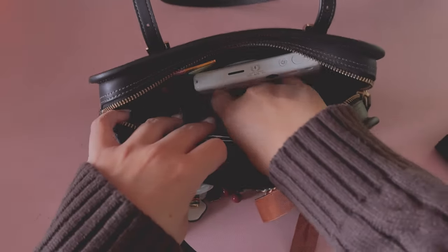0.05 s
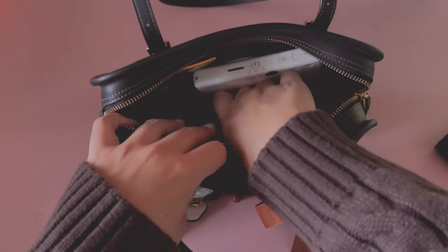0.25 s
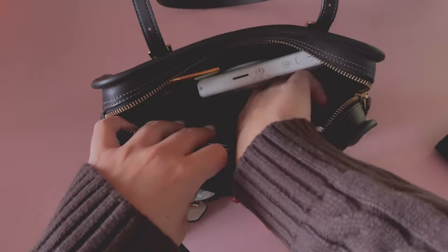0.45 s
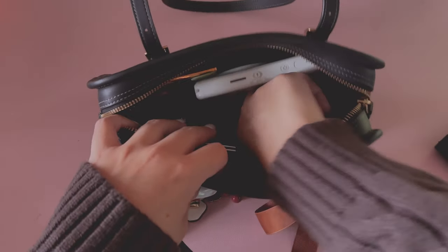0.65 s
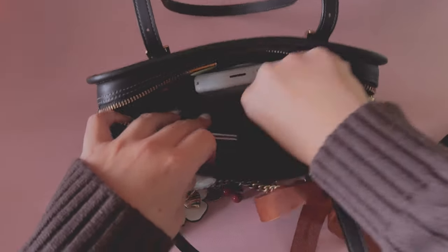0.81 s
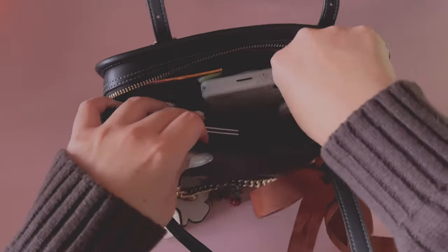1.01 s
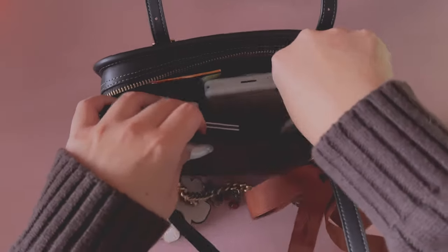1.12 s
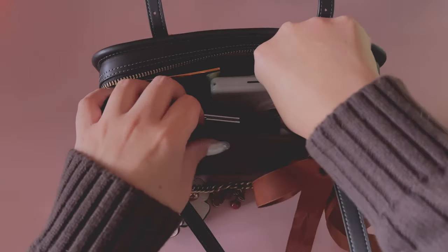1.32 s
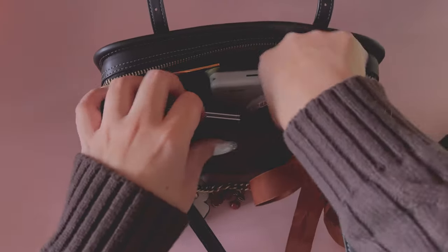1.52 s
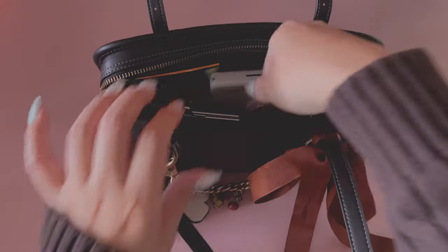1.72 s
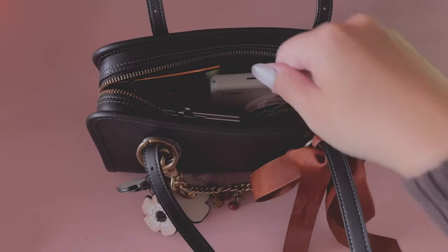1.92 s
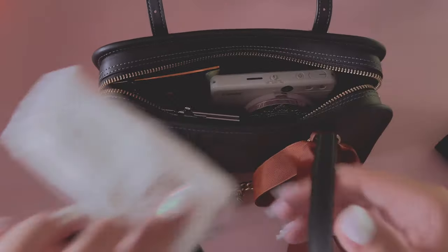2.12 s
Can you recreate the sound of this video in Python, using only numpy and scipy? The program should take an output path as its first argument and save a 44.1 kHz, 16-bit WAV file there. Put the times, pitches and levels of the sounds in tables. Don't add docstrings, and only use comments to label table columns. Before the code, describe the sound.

A small hollow plastic camera is pushed into a leather handbag with rustles, knocks and a thud

```python
import sys
import numpy as np
from scipy import signal
from scipy.fft import rfft, irfft, next_fast_len
from scipy.io import wavfile

SR = 44100
rng = np.random.default_rng(int(sys.argv[2]) if len(sys.argv) > 2 else 0)


def to_linear_factor(level_db):
    exponent = np.asarray(level_db, float) / 20
    return 10 ** exponent


def transcribe(u):
    v = np.clip(np.atleast_2d(u).T, -1, 1)
    q = np.round(v * 32767).astype(np.int16)
    wavfile.write(sys.argv[1], SR, q)


N = 94815

# frequency in Hz, level in dB per Hz.
ROOM_SPECTRUM = [(30, -12), (130, -0.5), (200, -17.5), (400, -20.5), (900, -37.5), (1400, -43), (5000, -55),
                 (9000, -57), (16000, -49)]
# frequency in Hz, width in Hz, level in dB.
ROOM_MODES = [(55.3, 12, -50.5), (121.1, 26, -49.5)]
# time in seconds, strength in dB.
TABLE_PUSHES = [
    (.36, -41),
    (1.082, -23),
    (1.0915, -19),
    (1.13, -29.5),
    (1.16, -32.5),
    (1.556, -39),
    (1.83, -44),
]
# frequency in Hz, level in dB, 60 dB decay in seconds.
TABLE_MODES = [(59.6, -2, 0.19), (70.5, 1.5, 0.2), (129.1, 5, 0.11), (181, -14, 0.016), (246.4, -2, 0.042)]
# time in seconds, peak in dB, pitch in Hz.
CHAIN_LINKS = [
    (0.96, -38.5, 14300),
    (1.248, -37, 14080),
    (1.3098, -47, 14080),
    (0.952, -36, 14080),
    (0.997, -57.5, 6100),
]
# time in seconds, peak in dB, pitch in Hz.
NAIL_TICKS = [(0.2083, -22.5, 6140), (0.5771, -32, 7680), (0.589, -28.5, 6700), (0.6149, -45, 6060),
              (0.7022, -38, 7850), (0.728, -29, 7500), (0.7568, -29, 5870), (0.8177, -28.5, 6260),
              (0.8985, -34, 5940), (0.749, -43, 6000), (0.998, -43, 6170), (1.1227, -49, 6600),
              (1.138, -33.5, 6000), (1.1685, -29, 6450), (1.3677, -30, 8740), (1.7035, -40, 6700),
              (1.72, -36, 5540), (1.7466, -38, 5900), (2.044, -46, 9300)]
# time in seconds, peak in dB, pitch in Hz.
ZIP_FLICKS = [
    (0.2085, -16.5, 13400),
    (0.2094, -23, 14000),
    (0.2112, -52, 13200),
]
# time in seconds, peak in dB.
CREAK_SLIPS = [
    (0.0822, -32),
    (0.0874, -35.5),
    (0.0964, -31),
    (0.1052, -26.5),
    (0.1124, -40),
]
# time in seconds, peak in dB, pitch in Hz.
FOLD_GRAINS = [(0.166, -42, 2700), (0.2085, -31, 4130), (0.216, -38, 1600), (0.749, -39, 2800),
               (1.074, -39, 1500), (1.1705, -28, 1200), (1.173, -34.5, 2440), (1.243, -44.5, 3300),
               (1.455, -45.5, 3400), (0.295, -52, 1250), (0.299, -50, 1220), (0.3098, -60, 1500),
               (0.324, -50, 2080), (0.3505, -40, 1650), (0.3565, -38, 1650), (0.3805, -54, 1700),
               (0.39, -51, 1300), (0.529, -49, 2260), (0.5775, -39.5, 2500), (0.597, -46, 2320),
               (0.601, -49, 1100), (0.617, -31, 1440), (0.626, -41, 2360), (0.64, -45, 1300),
               (0.67, -27.5, 1500), (0.69, -40, 2230), (0.826, -28.5, 1330), (0.915, -35, 2000),
               (0.925, -40, 2000), (1.227, -39, 1400), (1.246, -38.5, 860), (1.367, -39, 1050),
               (1.553, -51, 1700), (1.595, -53, 2190), (1.634, -35.5, 1500), (1.644, -37, 2000),
               (1.652, -37, 2830), (1.66, -36, 1390), (1.674, -37, 1420), (1.72, -38.5, 2470),
               (1.781, -49, 1290), (2.1405, -38.5, 1500), (2.146, -44, 2800)]
# time in seconds, peak in dB.
SHELL_SNAPS = [(0.1724, -35), (0.185, -42), (0.349, -40.5), (0.6145, -34.5), (0.6586, -36.5),
               (0.6686, -33), (0.701, -39.5), (0.7372, -42), (1.124, -34), (1.168, -28), (1.2263, -48),
               (1.574, -48), (1.6347, -50), (1.643, -39), (1.6661, -43), (1.7039, -42), (1.834, -49.5)]
# start in
# seconds, length in seconds, pitch in Hz.
HOLLOW_RUBS = [
    (.12, .1, 430),
    (.62, .06, 430),
    (.824, .012, 2300),
    (.87, .075, 450),
    (1.26, .065, 1300),
    (1.287, .06, 450),
    (1.285, .07, 2650),
    (1.645, .05, 790),
    (1.325, .04, 900),
    (2.043, .008, 9000),
]
HOLLOW_LEVELS_DB = [-55, -49.5, -43.5, -47, -54, -47, -62, -50.5, -52.5, -58]
# start in seconds, length in seconds, level in dB, brightness in dB.
RUB_STROKES = [(-.02, 0.1, -46.5, 1.5), (0.077, 0.059, -56, 11), (0.146, 0.079, -45.5, 0.5),
               (0.212, 0.18, -54, 1), (0.342, 0.034, -41.5, -1.5), (0.39, 0.15, -55.5, -4.5),
               (0.522, 0.09, -53, 6), (0.576, 0.086, -39, -1), (0.685, 0.1, -47.5, 3.5),
               (0.79, 0.14, -47, 2.5), (0.848, 0.058, -39, 4), (0.953, 0.071, -48.5, -1),
               (1.038, 0.11, -50, 4), (1.124, 0.068, -43.5, -1), (1.21, 0.054, -50, 2.5),
               (1.265, 0.12, -53, 4), (1.386, 0.072, -54.5, 7), (1.453, 0.16, -50, 5.5),
               (1.626, 0.046, -47, 6.5), (1.698, 0.053, -48.5, 4), (1.781, 0.051, -53.5, -11),
               (2.065, 0.025, -87, 17)]
# frequency in Hz, level in dB per Hz.
RUSTLE_SPECTRUM = [(150, 0.5), (420, -3.5), (600, -5.5), (1200, -10.5), (5000, -26), (6500, -26),
                   (11000, -23.5), (15000, -24)]
# time in seconds, peak in dB, pitch in Hz.
WALL_TAPS = [(.372, -33, 346), (.62, -32, 300), (.854, -25, 345), (1.008, -36, 320), (1.131, -27, 434),
             (1.5585, -32.5, 410), (1.576, -43, 397), (2.06, -54, 570), (2.142, -36.5, 550)]
# time in seconds, level in dB, slip rate in Hz.
SLIDE_HIGH = [(.83, -48, 1100), (.839, -26.5, 1130), (.845, -28, 1272), (.852, -25, 1340),
              (.859, -33, 1356), (.864, -25.5, 1327), (.876, -54, 1330)]
# time in seconds, level in dB, slip rate in Hz.
SLIDE_LOW = [(.822, -47, 785), (.829, -30, 789), (.836, -36.5, 821), (.843, -33, 880), (.85, -35, 916),
             (.86, -44.5, 952)]
# frequency in Hz, width in Hz, level in dB.
BAG_CAVITY = [(377, 25, -0.5), (790, 130, -1), (1320, 18, -5.5), (1923, 19, -7.5), (2290, 23, -16),
              (3550, 26, -13.5)]
# time in seconds, peak in dB, pitch in Hz.
PLASTIC_KNOCKS = [(0.089, -41, 870), (0.133, -52, 800), (0.75, -44.5, 970), (0.152, -41, 730),
                  (0.209, -36, 805), (0.323, -44.5, 700), (0.536, -42, 1020), (0.559, -37, 840),
                  (0.5895, -26, 734), (0.66, -34.5, 1085), (0.738, -42.5, 790), (0.801, -44.5, 910),
                  (1.0785, -31.5, 712), (1.171, -29, 828), (1.556, -41, 904), (1.634, -41.5, 774),
                  (1.64, -45, 780), (1.66, -46, 780), (1.67, -50, 780), (1.679, -42.5, 770),
                  (1.689, -48, 695), (1.722, -46.5, 750), (2.1405, -39, 860)]
# frequency in Hz, lead in radians.
PORT_LEAD = [(4000, .05), (5800, -.4), (6800, -.9), (10300, -2.7), (11500, -3.05), (13400, -3.25),
             (15500, -4.2)]
# frequency in Hz, level in dB.
DIFFUSE_SHARE = [(100, -34), (400, -6.5), (1200, -9.5), (3000, -8.5), (6000, -4.5), (12000, -32)]

ROOM_DB = -41
PUSH_HZ = 300
GRAINS_PER_S, GRAIN_SPREAD_DB, SMOOTH_SHARE = 900, 5.5, 0.58
STROKE_ATTACK_S, STROKE_RELEASE_DB_PER_S = 0.0026, 476
HOLLOW_WIDTH_SHARE = 0.17
SQUEAK_HISS_DB, SQUEAK_ROUGH = -6.5, 0.3
KNOCK_T60_S, TAP_T60_S, TICK_T60_S, LINK_T60_S = 0.021, 0.028, 0.0094, 0.047
PIP_T60_S = 0.008
SNAP_HZ, SNAP_T60_S = 2447, 0.013
CREAK_HZ, CREAK_T60_S = 2600, 0.0047
LOW_CUT_HZ, CUTOFF_HZ = 46, 16000
BURST = 8192
DRIFT_STEP = 40


def rms_one(x):
    return x / np.sqrt(np.mean(x ** 2) + 1e-20)


def in_time(rows):
    s, *columns = np.transpose(rows)
    return [np.interp(np.arange(N) / SR, s, c) for c in columns]


def at_hz(points, hz):
    table_hz, values = np.transpose(points)
    return np.interp(np.log(hz + 1), np.log(table_hz), values)


def drift(rate):
    r = np.exp(-2 * DRIFT_STEP * np.pi * rate / SR)
    noise = rng.standard_normal(N // DRIFT_STEP + 2002)
    slow = signal.lfilter([1], [1, -2 * r, r * r], noise)[2000:]
    return np.interp(np.arange(N) / DRIFT_STEP, np.arange(len(slow)), rms_one(slow))


def low_pass(x, hz):
    return signal.sosfilt(signal.butter(2, hz, fs=SR, output="sos"), x)


def band_pass(x, low, high):
    return signal.sosfilt(signal.butter(2, [low, high], "band", fs=SR, output="sos"), x)


def ring(x, hz, t60):
    r = to_linear_factor(-60 / (t60 * SR))
    w = 2 * np.pi * min(hz, SR / 2.1) / SR
    return signal.lfilter([0, np.sin(w)], [1, -2 * r * np.cos(w), r * r], x + 1e-18)


def resonate(x, hz, width):
    r = np.exp(-np.pi * width / SR)
    poles = [1, -2 * r * np.cos(2 * np.pi * hz / SR), r * r]
    return signal.lfilter((1 - r * r) / 2 * np.array([1, 0, -1]), poles, x)


def clicks(rows):
    out = np.zeros(N)
    for s, db in rows:
        out[min(int(s * SR), N - 1)] = to_linear_factor(db)
    return out


def banded(source, spectrum, patchy_db, tilt_db=0):
    out, together = 0, drift(45)
    edges = 25 * 2 ** np.arange(0, 9.6, .5)
    for k, (low, high) in enumerate(zip(edges, edges[1:])):
        hz = np.sqrt(low * high)
        level_db = at_hz(spectrum, hz)
        band = band_pass(source[k % 2], low, high)
        flicker_db = patchy_db * (0.86 * together + 0.8 * drift(7.8))
        tilt = to_linear_factor(tilt_db * np.clip(np.log2(hz / 1000) / 3, -1, 1))
        out = out + band * to_linear_factor(level_db + flicker_db)
        out = out + band * to_linear_factor(level_db) * (tilt - 1)
    return out


def struck(flurry, hz, t60):
    clean_strike = ring(np.arange(len(flurry)) == 0, hz, t60)
    return rms_one(ring(flurry, hz, t60)) * np.std(clean_strike)


def bursts(rows, t60, partials, scatter_s, noise_db, low_share, top_hz):
    out, t = np.zeros(N + BURST), np.arange(BURST) / SR
    for (s, db, hz), noise in zip(rows, rng.standard_normal((len(rows), BURST))):
        flurry = noise * np.exp(-t / scatter_s)
        tone = sum(to_linear_factor(level_db) * struck(flurry, hz * ratio, t60 / ratio ** .5)
                   for ratio, level_db in partials)
        onset = np.minimum(t / scatter_s * 2, 1)
        decay = to_linear_factor(noise_db - 60 * np.maximum(t - scatter_s, 0) / t60)
        crack = band_pass(noise[::-1], low_share * hz, top_hz) * decay * onset
        start = int(s * SR)
        out[start:start + BURST] += to_linear_factor(db) * (low_pass(tone, top_hz) + crack)
    return out[:N]


def room_tone():
    hum = 0
    for hz, width, db in ROOM_MODES:
        mode = resonate(resonate(rng.standard_normal(N + SR), hz, width), hz, 2 * width)
        hum = hum + to_linear_factor(db) * rms_one(mode[SR:])
    floor = rms_one(banded(rng.standard_normal((2, N)), ROOM_SPECTRUM, patchy_db=1.2))
    return hum + to_linear_factor(ROOM_DB - 4.5) * floor[::-1]


def table_thuds():
    push = low_pass(clicks(TABLE_PUSHES) + 1e-18, PUSH_HZ)
    return sum(to_linear_factor(db) * ring(push, hz, t60) for hz, db, t60 in TABLE_MODES)


def chain_links():
    return sum(ring(clicks([(s, db)]), hz, LINK_T60_S) for s, db, hz in CHAIN_LINKS)


def nail_ticks():
    return bursts(NAIL_TICKS, TICK_T60_S, [(1, -10), (2.45, 5.5)],
                  scatter_s=0.00053, noise_db=-7, low_share=0.99, top_hz=20500)


def zip_flicks():
    return bursts(ZIP_FLICKS, TICK_T60_S, [(0.99, 0)],
                  scatter_s=0.0003, noise_db=-16, low_share=0.17, top_hz=16300)


def leather_creaks():
    slip = clicks(CREAK_SLIPS)
    bright = to_linear_factor(-12.5) * ring(slip, 2760, 0.002)
    body = to_linear_factor(-9.0) * ring(slip, 820, 0.025)
    return ring(slip, CREAK_HZ, CREAK_T60_S) + bright + body


def fold_grains():
    return bursts(FOLD_GRAINS, PIP_T60_S, [(1, 3), (1.6, -7)],
                  scatter_s=0.002, noise_db=-8, low_share=0.26, top_hz=4030)


def shell_snaps():
    rows = [(*row, SNAP_HZ) for row in SHELL_SNAPS]
    return bursts(rows, SNAP_T60_S, [(.55, -8.5), (1.35, -9.5)],
                  scatter_s=0.0028, noise_db=2.5, low_share=0.64, top_hz=3860)


def swell(s, length, db):
    t = np.arange(N) / SR
    fade_db = STROKE_RELEASE_DB_PER_S * np.maximum(t - s - length, 0)
    return np.clip((t - s) / STROKE_ATTACK_S, 0, 1) ** 2 * to_linear_factor(2 * (db - fade_db))


def hollow_rubs():
    flutter, out = to_linear_factor(2.5 * drift(60)), 0
    for (s, length, hz), db in zip(HOLLOW_RUBS, HOLLOW_LEVELS_DB):
        song = rms_one(resonate(rng.standard_normal(N), hz, HOLLOW_WIDTH_SHARE * hz))
        out = out + np.sqrt(swell(s, length, db)) * song
    return flutter * out


def pressure():
    parts = [swell(s, length, db) for s, length, db, _ in RUB_STROKES]
    power = sum(parts) + 1e-12
    bright_db = sum(part * row[-1] for part, row in zip(parts, RUB_STROKES)) / power
    return np.sqrt(power), bright_db


def rustle():
    level, bright_db = pressure()
    sizes = to_linear_factor(GRAIN_SPREAD_DB * np.minimum(rng.exponential(1, N), 5)) * rng.choice([-1, 1], N)
    happens = rng.random(N) < GRAINS_PER_S * to_linear_factor(5 * drift(40)) / SR
    grains = rms_one(sizes * happens)
    source = SMOOTH_SHARE * rng.standard_normal((2, N)) + (1 - SMOOTH_SHARE) * grains
    return level * rms_one(banded(source, RUSTLE_SPECTRUM, patchy_db=3.0, tilt_db=bright_db))


def wall_taps():
    return bursts(WALL_TAPS, TAP_T60_S, [(1, 2.5), (1.5, -41)],
                  scatter_s=0.0099, noise_db=-28, low_share=.6, top_hz=1500)


def slips(rows):
    level_db, hz = in_time(rows)
    phase = 2 * np.pi * np.cumsum(hz * (1 + 0.018 * drift(140))) / SR
    return to_linear_factor(level_db), np.sin(phase) * to_linear_factor(10 * SQUEAK_ROUGH * drift(120))


def squeak():
    level, tone = slips(SLIDE_HIGH)
    low_level, low_tone = slips(SLIDE_LOW)
    on = np.abs(np.arange(N) / SR - .848) < .03
    hiss = rng.standard_normal(N)
    cavity = sum(to_linear_factor(db) * resonate(hiss, hz, 2.0 * width) / width ** .5 for hz, width, db in BAG_CAVITY)
    body = rms_one(cavity + to_linear_factor(-46) * hiss)
    return on * (level * tone + low_level * low_tone + to_linear_factor(SQUEAK_HISS_DB) * (level + low_level) * body)


def plastic_knocks():
    return bursts(PLASTIC_KNOCKS, KNOCK_T60_S, [(1, 6.5), (1.7, -10), (2.8, -25.0)],
                  scatter_s=0.00034, noise_db=-7, low_share=0.24, top_hz=2000)


def ports(x):
    size = next_fast_len(N + SR // 2)
    hz, t = np.arange(size // 2 + 1) * SR / size, np.arange(SR // 4) / SR
    opposite = np.array([[1], [-1]])
    tail = rng.standard_normal((2, SR // 4)) * to_linear_factor(-60 * t / 0.087) * (t > .001)
    tail = rfft(tail / np.sqrt(np.sum(tail ** 2, axis=1, keepdims=True)), size)
    turn = np.exp(.5j * at_hz(PORT_LEAD, hz) * opposite)
    wet = to_linear_factor(at_hz(DIFFUSE_SHARE, hz)) * (tail[1] * opposite + 0.7 * tail[0] * turn)
    return irfft(rfft(x, size) * (turn + wet), size)[:, :N]


def scene():
    metal = nail_ticks() + zip_flicks()
    leather = leather_creaks() + fold_grains() + shell_snaps() + hollow_rubs() + rustle()
    camera = wall_taps() + squeak() + plastic_knocks()
    bag = chain_links() + metal + leather + camera
    return ports(room_tone() + table_thuds() + bag) + to_linear_factor(-12.5) * metal


def band_limit(x):
    return signal.sosfilt(signal.butter(12, 17150, fs=SR, output="sos"), x)


def record(dry):
    cut = signal.sosfilt(signal.butter(4, LOW_CUT_HZ, "high", fs=SR, output="sos"), dry)
    mix = signal.sosfilt(signal.ellip(10, .5, 60, CUTOFF_HZ + 50, fs=SR, output="sos"), cut)
    return band_limit(mix)


dry = scene()
out = record(dry)
transcribe(out)
```